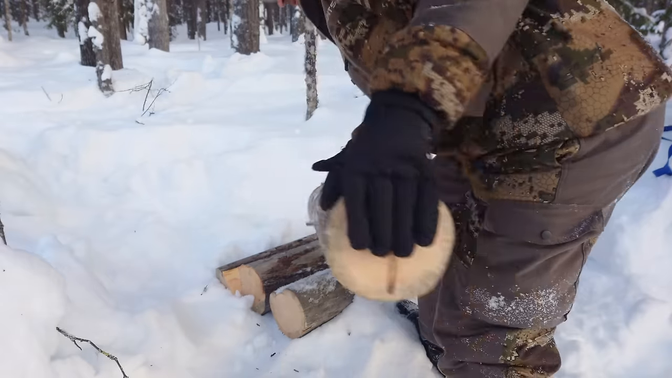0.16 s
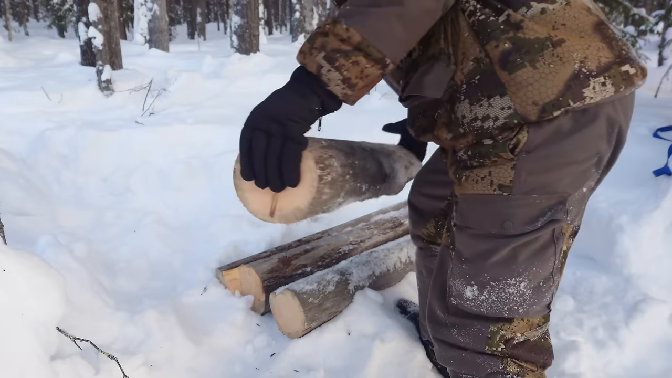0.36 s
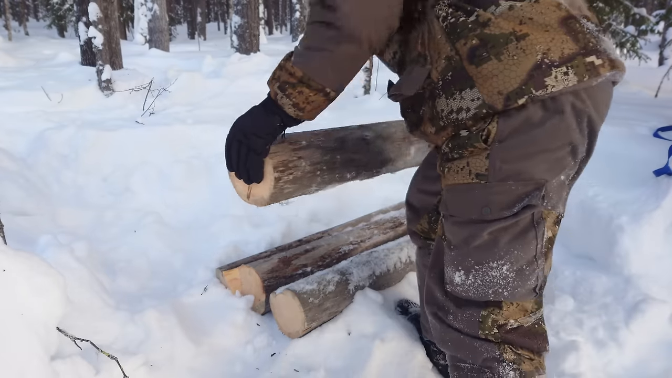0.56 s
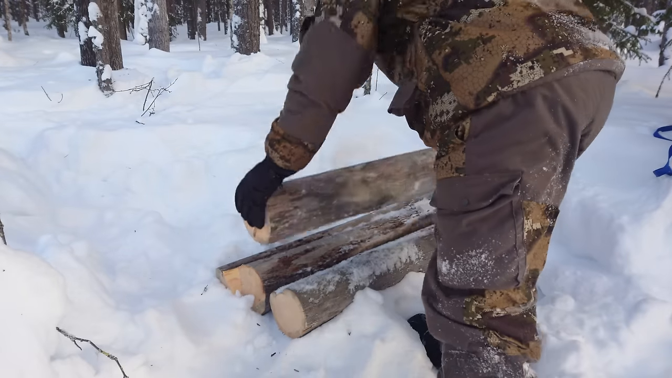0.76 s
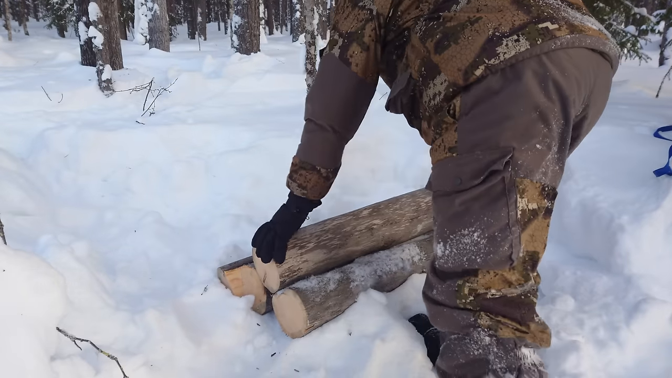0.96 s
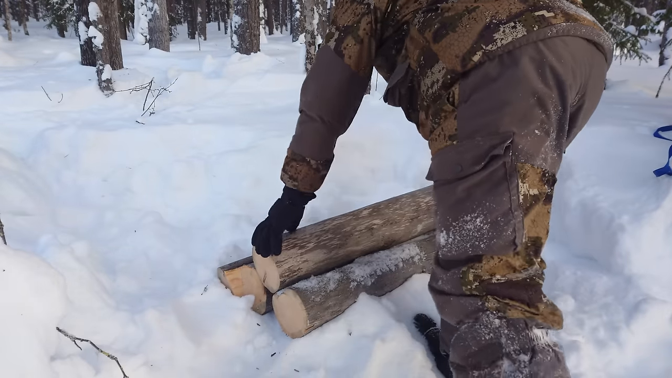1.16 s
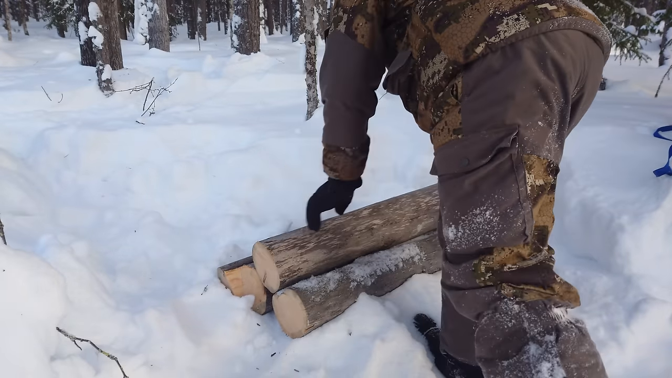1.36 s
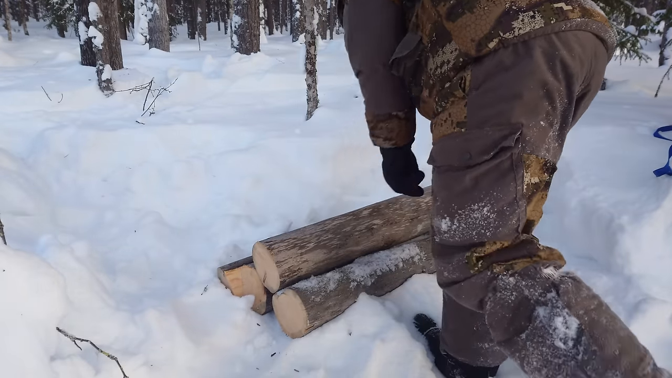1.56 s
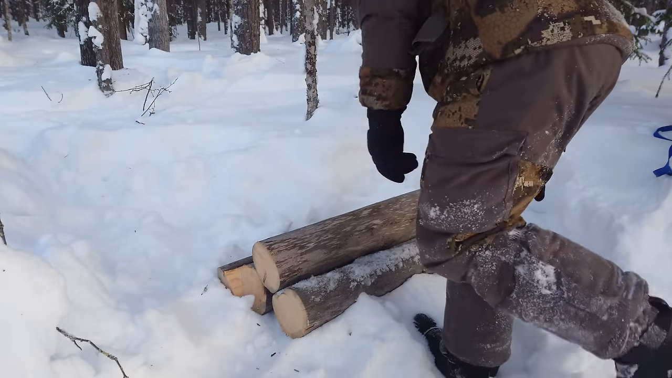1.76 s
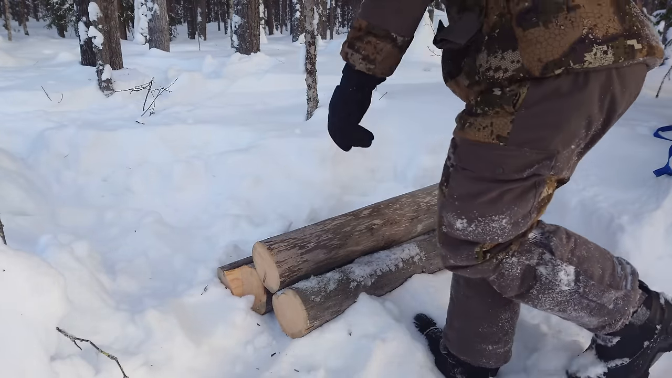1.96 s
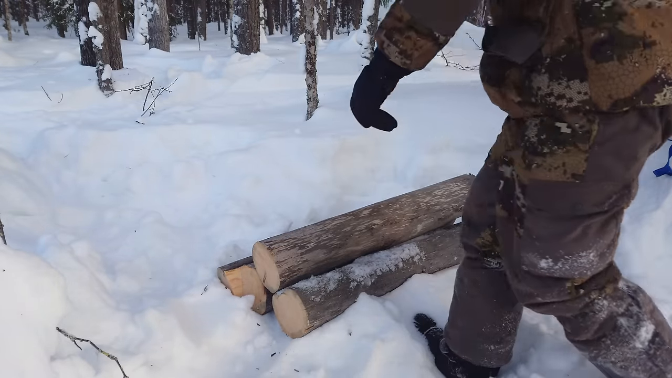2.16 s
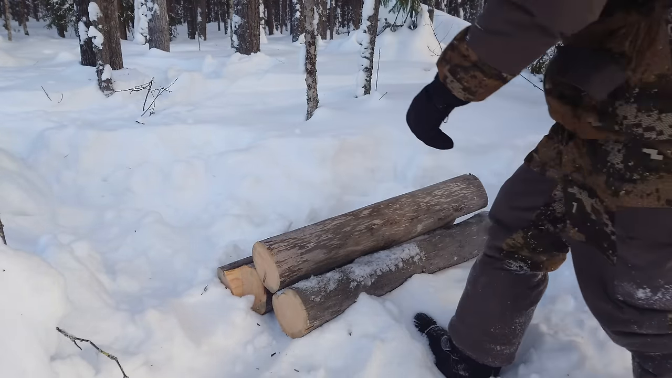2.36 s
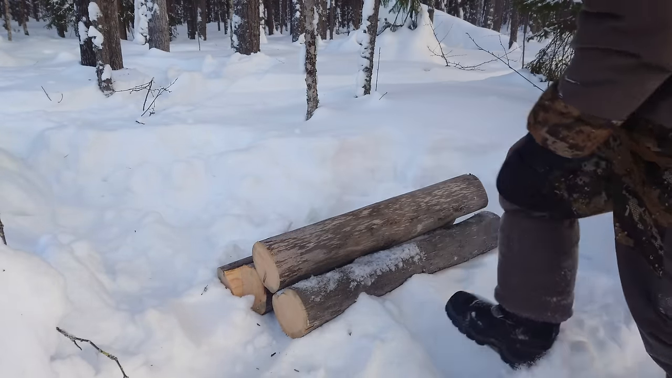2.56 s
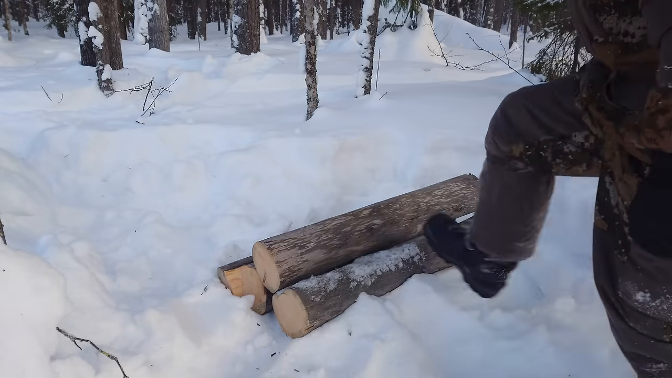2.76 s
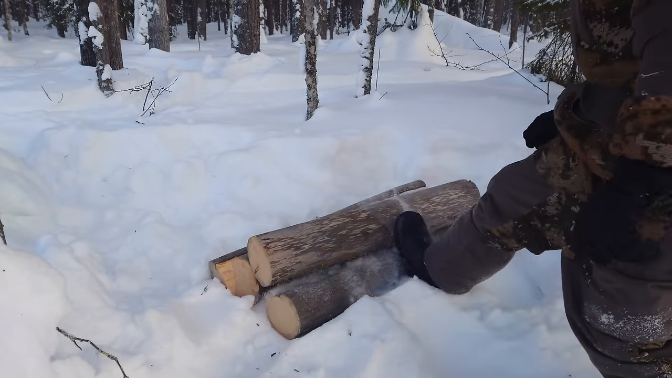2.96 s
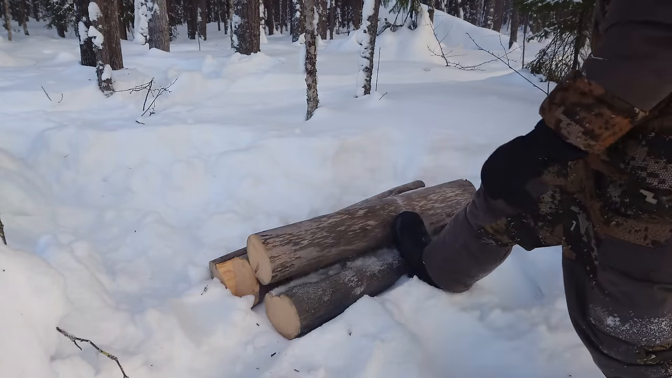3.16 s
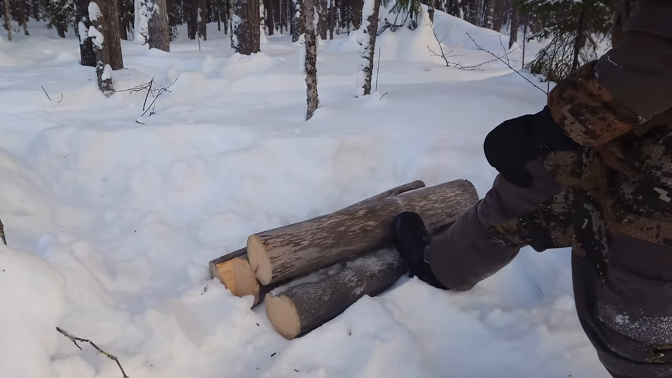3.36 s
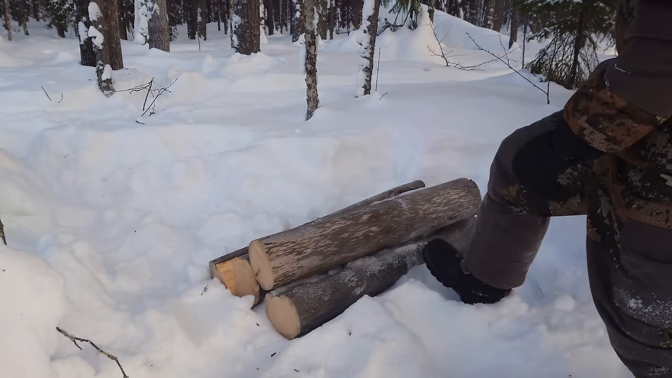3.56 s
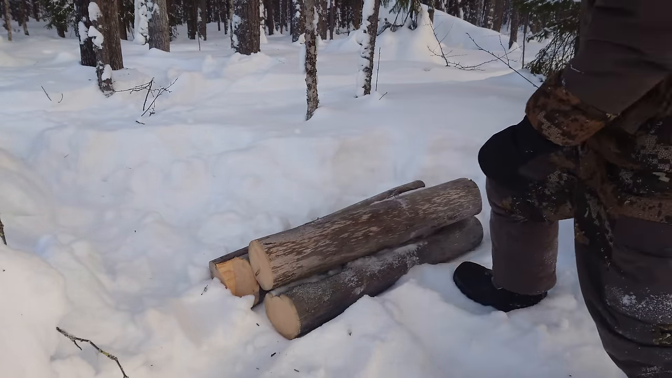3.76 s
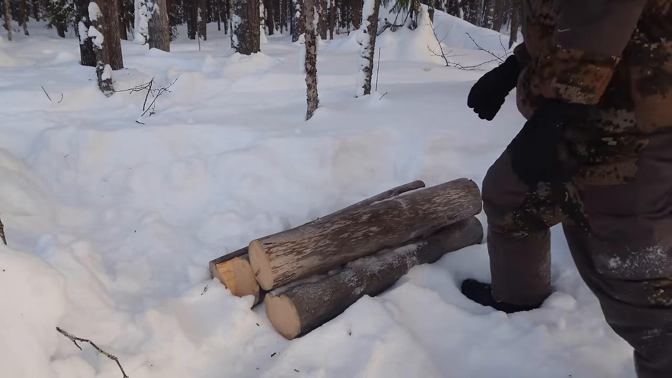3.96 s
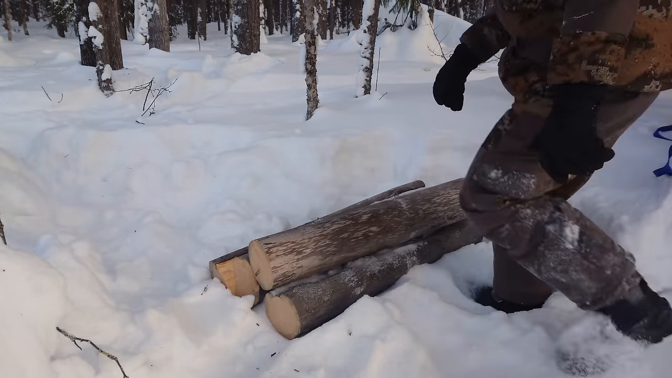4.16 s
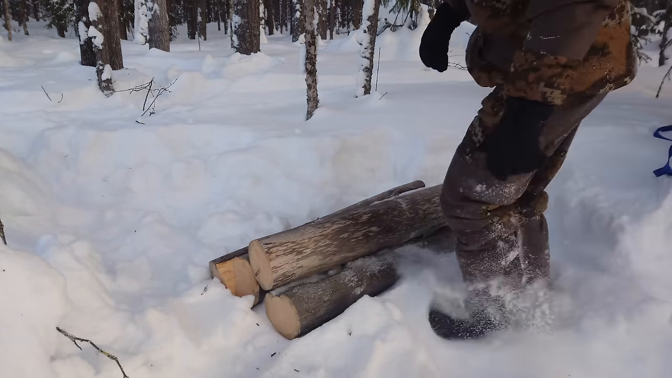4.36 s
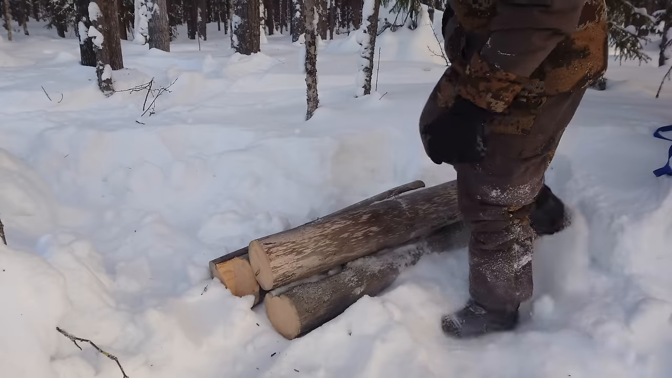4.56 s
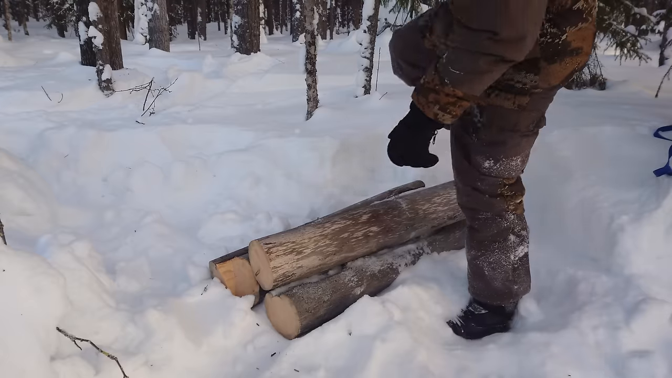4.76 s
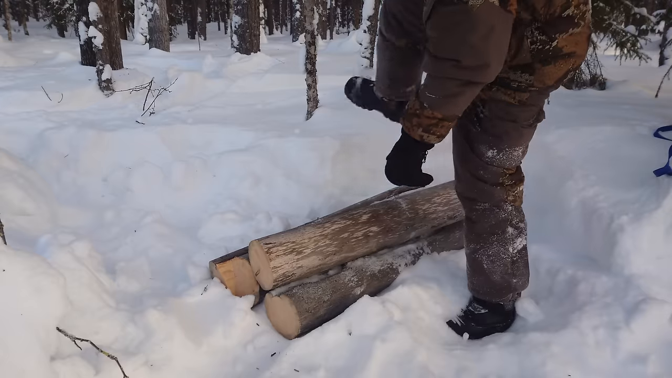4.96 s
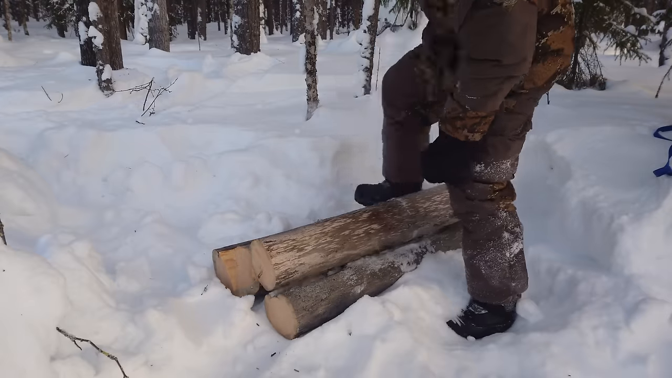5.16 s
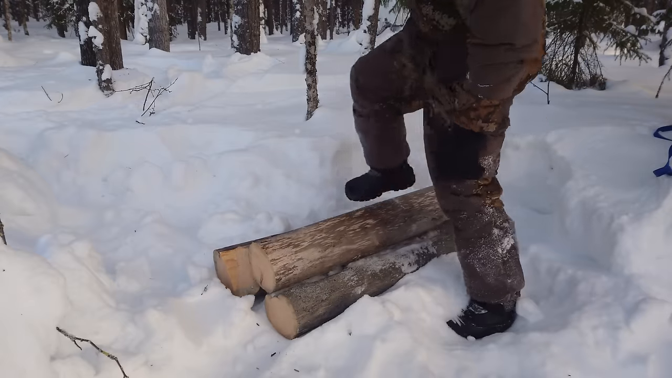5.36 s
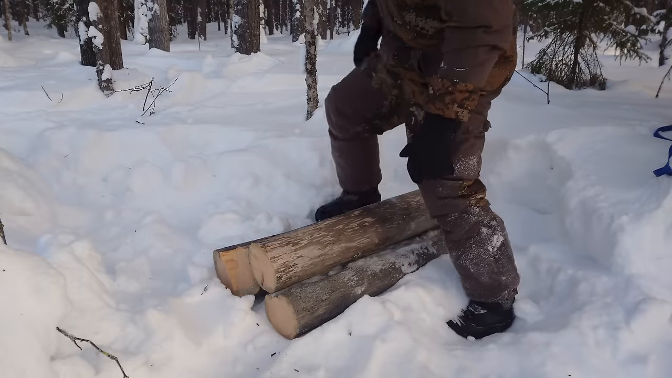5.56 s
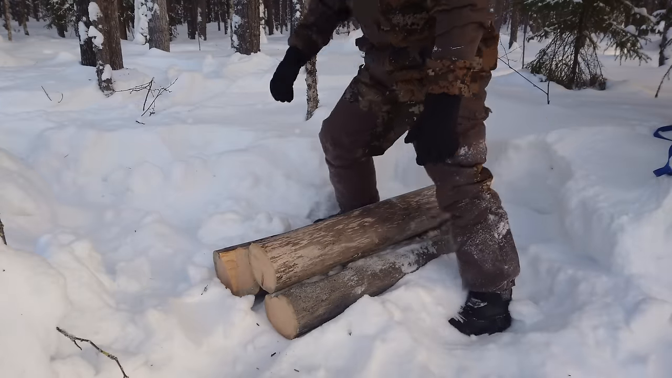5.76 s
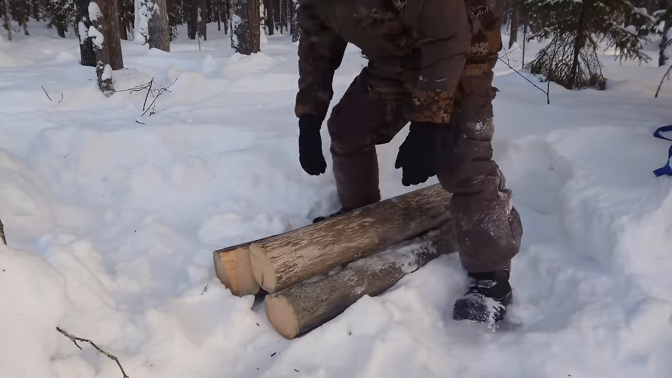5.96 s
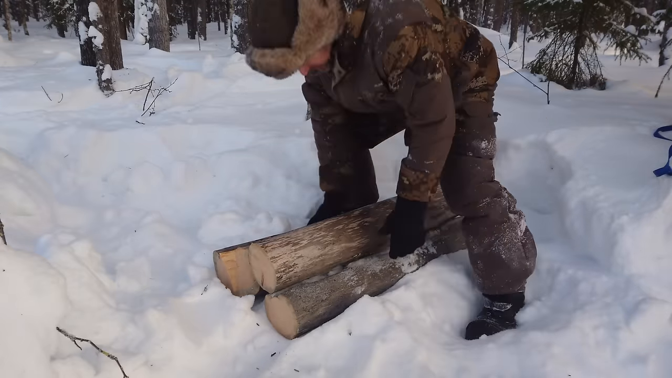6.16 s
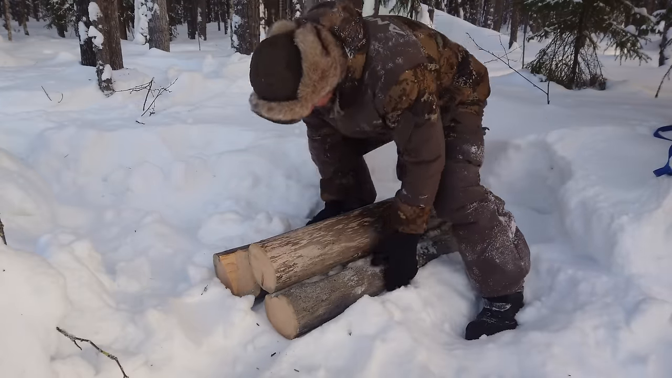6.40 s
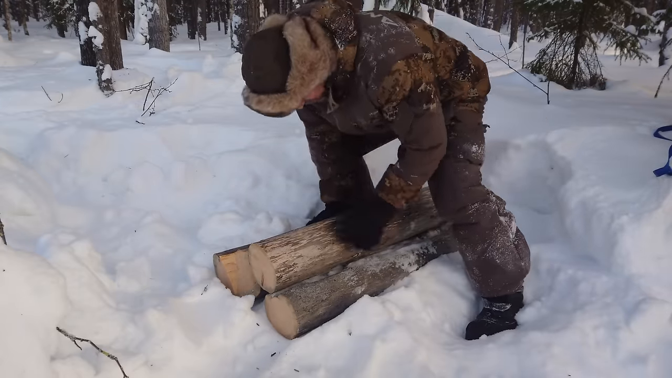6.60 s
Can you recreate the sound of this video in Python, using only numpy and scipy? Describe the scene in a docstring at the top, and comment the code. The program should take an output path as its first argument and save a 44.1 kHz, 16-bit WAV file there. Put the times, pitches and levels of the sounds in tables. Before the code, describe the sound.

Hollow knocks of a log being stacked and the pile kicked, with crunching steps in deep snow and rustling heavy clothes.

```python
"""Stacking a frozen log in deep snow

A man in winter clothes drops a short log on a small stack, then kicks the stack into line. The logs
ring hollow and thump the ground. His boots plough and pack the snow, and scrape and squeak on the bark;
trousers and sleeves swish. The snowy forest barely echoes. The loudest knock overloads the microphone."""
import sys
import numpy as np
from scipy import signal
from scipy.fft import rfft, irfft
from scipy.io import wavfile

SR = 44100
rng = np.random.default_rng(int(sys.argv[2]) if len(sys.argv) > 2 else 0)


def file_out(sig):
    """Save sig as 16-bit WAV at sys.argv[1]."""
    # one column per channel
    cols = np.atleast_2d(sig).T
    # limit, then scale
    lim = np.clip(cols, -1, 1)
    pcm = np.round(lim * 32767).astype(np.int16)
    wavfile.write(sys.argv[1], SR, pcm)


N = 292383
TIME = np.arange(N) / SR

# logs bouncing on each other (below 250 Hz) and bending: freq_hz, base_db, base_t60_s
LOG_MODES = [(108.6, 3, 0.063), (162, 2, 0.027), (212, -6.5, 0.057), (479.6, 4, 0.048), (530, 1, 0.18),
             (554.8, -4, .15), (670, -6.5, 0.052), (745, -2.5, 0.035), (998, -5.5, 0.041),
             (1111, -7.5, 0.051), (1177, -14, 0.12), (1530, -19.5, .028), (1730, -30, 0.04),
             (1846, -21, 0.033), (2137, -22, 0.043), (2400, -26.5, 0.065), (2910, -27.5, 0.071),
             (2730, -18, .03), (3350, -22, .03), (3800, -14, .03)]
# bark crunch spectrum: freq_hz, density_db
BARK_SPECTRUM = [(200, -10.5), (700, -10.5), (1400, 3), (2000, -7), (3000, 1), (4500, 3), (7000, -2.5),
                 (10000, -10.5), (15800, -16)]
# boot dragged over bark: start_s, length_s, ring_db, grit_db
SCRAPES = [(2.913, 0.17, -53.5, -48), (3.369, .11, -47, -47), (5.116, 0.064, -43.5, -39.5),
           (5.167, 0.16, -50, -62), (5.315, 0.16, -52.5, -46.5), (5.438, 0.09, -56, -52.5),
           (5.619, 0.11, -45.5, -44), (6.19, 0.23, -68, -52)]
# boot sinking into snow: start_s, length_s, pressure_db, loose_snow_db
STEPS = [(0.258, 0.052, -45.5, -57), (0.567, 0.28, -42, -41), (2.106, .24, -46, -43.5),
         (2.361, .2, -39, -46), (2.915, 0.12, -55.5, -56), (3.8, 0.23, -44, -48),
         (4.307, 0.23, -38.5, -41.5), (5.596, .16, -44.5, -55), (5.954, .36, -39.5, -48.5)]


def undb(db):
    """Decibels to gain."""
    return 10 ** (np.asarray(db) / 20)


def unit(x):
    """Scale to rms 1."""
    return x / np.sqrt(np.mean(x ** 2))


def add(out, start_s, x):
    """Mix x into out from start_s."""
    i = max(int(start_s * SR), 0)
    out[i:i + len(x)] += x[:max(N - i, 0)]


def fade(t60_s, size=26000):
    """Decay of 60 dB in t60_s."""
    return np.exp(-np.log(1000) * TIME[:size] / t60_s)


def colour(x, spectrum, size=8192):
    """Minimum-phase filter of unit power through (freq_hz, density_db) points."""
    hz, db = np.transpose(spectrum)
    bins_hz = np.maximum(np.arange(size // 2 + 1) * SR / size, 1)
    gain = undb(np.interp(np.log(bins_hz), np.log(hz), db))
    cepstrum = irfft(np.log(gain))
    cepstrum[1:size // 2] *= 2
    cepstrum[size // 2 + 1:] = 0
    response = irfft(np.exp(rfft(cepstrum)))
    return signal.fftconvolve(x, response / np.linalg.norm(response))[:len(x)]


def wander(rate_hz):
    """Smooth random drift, spread near 1."""
    knots = rng.standard_normal(int(N / SR * rate_hz) + 2)
    return np.interp(TIME * rate_hz, np.arange(len(knots)), knots)


def grains(per_s, spread_db):
    """Random tiny fractures, mostly weak; rms 1."""
    sizes = undb(spread_db * np.minimum(rng.exponential(size=N), 4))
    return unit((rng.random(N) < per_s / SR) * rng.choice([-1, 1], N) * sizes)


def ring(modes, t60_scale=1, mode_ratio=1, size=26000):
    """Free ring; mode k is weighted by mode_ratio ** k, so a negative ratio alternates polarity."""
    return sum(mode_ratio ** k * undb(db) * np.sin(2 * np.pi * hz * TIME[:size])
               * fade(t60_s * t60_scale, size) for k, (hz, db, t60_s) in enumerate(modes))


def push(x, contact_ms, size=2000):
    """Soften a ring by a force pulse lasting about contact_ms."""
    u = TIME[:size] * 4000 / contact_ms
    force = u * np.exp(-u)
    return signal.fftconvolve(x, force / force.sum())[:len(x)]


def swell(start_s, length_s, attack_s=0.019, release_s=0.04):
    """Attack, hold and release of a boot's weight, 0-1."""
    held_s = max(length_s, attack_s)
    return np.interp(TIME - start_s, [0, attack_s, held_s, held_s + release_s], [0, 1, 1, 0])


def forest(x, echo_db=-43, t60_s=0.63, delay_s=0.054, hiss_db=-63):
    """Distant trunks scatter a very faint echo over a steady, soft hiss."""
    # freq_hz, density_db
    echo_spectrum = [(100, -14.5), (300, -12), (550, -7), (2000, -2), (8000, -6)]
    hiss_spectrum = [(200, -1), (2500, -15), (5000, -7.5), (10000, -12), (15800, -16)]
    response, tail = np.zeros(N), fade(t60_s)
    add(response, delay_s, tail * colour(rng.standard_normal(len(tail)), echo_spectrum))
    echo = signal.fftconvolve(x, response / np.linalg.norm(response))[:N]
    hiss = colour(rng.standard_normal(N), hiss_spectrum)
    return undb(echo_db) * echo + undb(hiss_db) * hiss


def rumble(step_db=-32, scrape_db=-36, rest_db=-44, shake_s=0.15):
    """Low rumble that swells when a boot loads the snow or the stack."""
    # ground rumble: freq_hz, density_db
    spectrum = [(5, -3), (15, 9.5), (30, -1), (60, -4.5), (90, -16), (150, -26.5), (400, -63.5)]
    load = np.zeros(N)
    for rows, db in ((STEPS, step_db), (SCRAPES, scrape_db)):
        for start_s, length_s, *_ in rows:
            load = np.maximum(load, undb(db) * swell(start_s, length_s, release_s=shake_s))
    return colour(rng.standard_normal(N), spectrum) * np.hypot(load, undb(rest_db))


def clothes(crisp_hz=8000, flutter_db=1.3, peak_at=0.27):
    """Fibres rub and heavy fabric crumples dully as the man moves; quick swishes are crisper."""
    # briskness of movement: time_s, relative_db
    movement = [(0.0, -47.5), (0.5, -48.5), (0.76, -45), (0.94, -57), (1.2, -59), (1.62, -50.5),
                (2.03, -54), (2.16, -49), (2.69, -43.5), (2.86, -45), (3.05, -58), (3.32, -58.5),
                (3.51, -53), (3.84, -50.5), (4.06, -44), (4.38, -44), (4.54, -48), (5.15, -51.5),
                (5.28, -52), (5.63, -56), (5.96, -50), (6.26, -43), (6.5, -53), (6.63, -51)]
    # sleeve or trouser strokes: start_s, length_s, relative_db
    swishes = [(.81, 0.15, -41.5), (1.198, 0.13, -50.5), (1.662, .16, -49.5), (1.981, 0.069, -43),
               (2.022, 0.32, -43.5), (2.676, 0.071, -47), (3.37, .09, -49.5), (4.11, 0.19, -45.5),
               (4.262, 0.23, -37.5), (4.453, 0.12, -40.5), (4.81, 0.085, -44), (5.792, .05, -48.5),
               (5.885, .045, -45), (6.048, 0.2, -42.5), (6.315, .027, -33), (6.395, 0.13, -45.5),
               (6.528, 0.031, -45)]
    # rubbing fibres, crumpling fabric: freq_hz, density_db
    rub_spectrum = [(400, -26), (1000, -5.5), (2000, -8.5), (2800, -10.5), (3800, -3.5), (4800, -1.5),
                    (6000, -3.5), (7500, -7), (9500, -11.5), (12500, -15.5), (15800, -22)]
    crumple_spectrum = [(100, -1.5), (250, 2.5), (450, 3), (800, 1), (1400, -4.5), (2200, -9.5),
                        (3200, -13.5), (8000, -38)]
    rustle = undb(np.interp(TIME, *np.transpose(movement)) + 2)
    swish = sum(undb(db) * np.sqrt(np.interp((TIME - start_s) / length_s, [0, peak_at, 1], [0, 1, 0]))
                for start_s, length_s, db in swishes)
    fibres = colour(unit(rng.standard_normal(N) + 0.8 * grains(3000, 2.2)), rub_spectrum)
    treble = signal.sosfiltfilt(signal.butter(2, crisp_hz, "high", fs=SR, output="sos"), fibres)
    rub = (fibres - treble) * np.hypot(rustle, swish)
    rub += treble * np.hypot(undb(-2) * rustle, undb(3) * swish)
    crumple = colour(grains(3500, 2.2), crumple_spectrum) * np.hypot(undb(-9) * rustle, undb(-11) * swish)
    return rub * undb(flutter_db * wander(70)) + crumple


def sleeve_zip(start_s=0.815, end_s=0.868, from_hz=1050, to_hz=2250, level_db=-36, jitter=0.11):
    """Ribbed cloth rubs ever faster as the log swings down: a short rising zip."""
    progress = np.clip((TIME - start_s) / (end_s - start_s), 0, 1)
    rib_hz = (from_hz + (to_hz - from_hz) * progress) * (1 + jitter * wander(1100))
    envelope = np.sqrt(np.abs(np.sin(np.pi * progress)))
    return undb(level_db) * envelope * np.sin(2 * np.pi * np.cumsum(rib_hz) / SR)


def steps(lead_s=0.03, plough_s=0.07, flutter_db=1.6):
    """Each boot ploughs loose snow aside, then deeper snow packs in small collapses."""
    # loose and packing snow: freq_hz, density_db
    powder_spectrum = [(100, -9), (250, -2.5), (450, 4), (800, 1), (1400, 0), (2200, -7.5), (3200, -8),
                       (8000, -23), (15000, -44)]
    packing_spectrum = [(40, -15.5), (90, 3), (170, 0), (260, -3.5), (450, -11), (800, -20.5),
                        (2000, -44.5)]
    pressure, loose = np.zeros(N), np.zeros(N)
    for start_s, length_s, pressure_db, loose_db in STEPS:
        pressure = np.maximum(pressure, undb(pressure_db) * swell(start_s, length_s))
        plough = swell(start_s - lead_s, length_s + lead_s, attack_s=plough_s)
        loose = np.maximum(loose, undb(loose_db) * plough)
    powder = colour(grains(3500, 2.6), powder_spectrum) * loose * undb(flutter_db * wander(60))
    packing = colour(grains(300, 4.5), packing_spectrum) * pressure * undb(-0.5)
    return powder + packing


def small_pops(per_step=3, above_db=4, scatter_db=3.5, pitch_hz=450, spread_octaves=0.5):
    """Random lesser pops, louder under more pressure: start_s, level_db, pitch_hz."""
    draws = rng.uniform(-0.91, 1, (len(STEPS), per_step, 3))
    return [(start_s + length_s * (when + 1) / 2,
             pressure_db + above_db + scatter_db * size,
             pitch_hz * 2 ** (spread_octaves * pitch))
            for (start_s, length_s, pressure_db, _), pops in zip(STEPS, draws)
            for when, size, pitch in pops]


def crumps(rise_cycles=0.35, settle_db=-10, settle_t60_s=0.06, size=3000):
    """A snow layer collapses with one dull pop, then crackles as it settles."""
    # packed snow giving way: start_s, level_db, pitch_hz
    loud_pops = [(.032, -33, 660), (.103, -31.5, 400), (0.163, -32, 330), (0.26, -34, 248),
                 (.276, -38, 396), (.286, -26, 410), (0.544, -29, 450), (.577, -22, 318),
                 (.626, -31.5, 800), (.692, -32.5, 510), (.740, -26, 302), (.752, -24, 200),
                 (0.967, -30, 159), (0.995, -38, 140), (2.403, -25, 304), (2.418, -29, 400),
                 (2.545, -28.5, 180), (2.695, -25.5, 367), (3.041, -40, 198), (3.197, -36, 297),
                 (3.761, -28, 423), (3.826, -38, 300), (4.026, -27.5, 255), (4.567, -25.5, 174),
                 (4.983, -29, 326), (5.007, -33, 283), (5.288, -36, 450), (5.584, -34, 905),
                 (5.609, -34.5, 710), (5.741, -30.5, 282), (5.991, -26.5, 169), (6.097, -28.5, 330),
                 (6.615, -30.5, 318)]
    # freq_hz, density_db
    settle_spectrum = [(60, -14), (200, -2), (500, 0.5), (900, -7.5), (1600, -20), (4000, -42.5)]
    pops, settling = np.zeros(N), np.zeros(N)
    for start_s, db, pitch_hz in loud_pops + small_pops():
        cycles = pitch_hz * TIME[:size]
        rise = cycles / rise_cycles
        add(pops, start_s, undb(db) * np.sin(2 * np.pi * cycles) * rise * np.exp(1 - rise))
        add(settling, start_s, undb(db + settle_db) * fade(settle_t60_s))
    return pops + colour(settling * grains(1500, 1.4), settle_spectrum)


def footfalls():
    """The snow pack thuds softly as each boot takes the weight."""
    # weight landing: start_s, gain_db
    landings = [(0.294, -28), (2.619, -17), (3.462, -26.5), (3.586, -17), (3.836, -25), (3.885, -22),
                (4.02, -22), (4.325, -26), (4.572, -26), (5.984, -22.5), (6.244, -15.5)]
    # snow pack: freq_hz, level_db, base_t60_s
    snow_modes = [(56.4, -1.5, 0.29), (79, -6, 0.17)]
    out = np.zeros(N)
    thud = push(ring(snow_modes, t60_scale=0.99), contact_ms=10)
    for start_s, db in landings:
        add(out, start_s, undb(db) * thud)
    return out


def snaps(splinter_db=-9):
    """Frozen bark and ice crust crack: one sharp release, then brief splintering."""
    # brittle cracks: start_s, impulse_db, splinter_t60_s
    fractures = [(.769, -21, 0.04), (0.854, -11.5, .003), (2.983, -23.5, 0.008), (3.281, -31.5, .013),
                 (3.341, -34.5, .017), (3.5932, -21.5, 0.0029), (5.133, -7, .003), (5.1521, -8.5, .0025),
                 (5.36, -29, .035), (5.648, -20, 0.014), (6.206, -19.5, 0.034), (6.228, -23.5, .037),
                 (6.309, -16, .022), (6.316, -16.5, 0.02)]
    # cracking ice: freq_hz, density_db
    ice_spectrum = [(500, -18), (1800, -8), (3000, -1.5), (4500, 4.5), (7000, -0.5), (10000, -17.5),
                    (15800, -24.5)]
    cracks, splinters = np.zeros(N), np.zeros(N)
    for start_s, db, t60_s in fractures:
        add(cracks, start_s, undb([db]))
        add(splinters, start_s, undb(db + splinter_db) * fade(t60_s))
    return colour(cracks + splinters * rng.standard_normal(N), ice_spectrum)


def squeaks(fall=0.16, jitter=0.085, rasp=0.47):
    """The sole sticks and slips at an uneven, falling rate, with a rasp of ice crystals."""
    # rubber on bark: start_s, length_s, pitch_hz, level_db
    slips = [(3.572, 0.013, 2524, -34), (5.466, 0.013, 2500, -30), (5.502, 0.013, 2470, -35.5),
             (5.517, 0.018, 2380, -40), (5.657, 0.017, 2400, -33.5)]
    out, wobble = np.zeros(N), wander(1500)
    grit = colour(grains(6800, 2.5), BARK_SPECTRUM)
    for start_s, length_s, pitch_hz, db in slips:
        progress = np.linspace(0, 1, int(length_s * SR))
        span = int(start_s * SR) + np.arange(len(progress))
        slip_hz = pitch_hz * (1 + fall * (0.5 - progress) + jitter * wobble[span])
        phase = 2 * np.pi * np.cumsum(slip_hz) / SR
        tone = np.sin(phase) + 0.93 * np.sin(2 * phase) + 0.53 * np.sin(3 * phase)
        add(out, start_s, undb(db) * np.sin(np.pi * progress) * (tone + rasp * grit[span]))
    return out


def scrapes():
    """The tread catches on bark ridges: tiny blows that crackle and keep the log humming."""
    drive, grit = np.zeros(N), np.zeros(N)
    catches = grains(1500, 2.7)
    for start_s, length_s, ring_db, grit_db in SCRAPES:
        stroke = np.sin(np.linspace(0, np.pi, int(length_s * SR)))
        add(drive, start_s, undb(ring_db) * stroke)
        add(grit, start_s, undb(grit_db) * stroke)
    # each catch pulls and lets go, favouring the upper modes
    body = np.diff(push(ring(LOG_MODES, t60_scale=0.68, mode_ratio=-1.05), contact_ms=0.42))
    hum = signal.fftconvolve(drive * catches, body / np.linalg.norm(body))[:N]
    return hum + colour(grit * catches, BARK_SPECTRUM)


def log_knocks(bark_t60_s=0.047, settle_s=0.125):
    """Each blow rings the wood, rocks the stack and crushes bark; a kick adds the boot's thud."""
    # blows: start_s, ring_db, contact_ms, t60_scale, thump_db, bark_db, boot_db
    knocks = [(.8770, -1.5, 0.43, 1.18, -14.5, -39, -57), (0.8814, -8, 0.18, 0.98, -41, -31, -62),
              (2.8331, -10.5, 0.39, 0.61, -11, -22, -20), (2.8400, -26, 0.22, 1.37, -24, -34, -40),
              (2.898, -35, 1, 2, -50, -60, -38), (3.464, -53.5, 0.92, 0.75, -34.5, -62, -48),
              (3.578, -48, .13, 1.5, -38, -28.5, -50), (5.1236, -26.5, 0.2, 0.55, -13.5, -27, -6.5),
              (5.243, -46.5, 0.4, 1.4, -29.5, -36.5, -44), (5.649, -52, 0.31, 1.3, -27, -34, -47),
              (6.250, -44, 1, 1., -22.5, -57, -44), (6.317, -43.5, 0.34, 0.6, -41, -28, -27)]
    # stack rocking on its snow bed: freq_hz, level_db, t60_s
    bed_modes = [(32.23, 2.5, 0.35), (65.8, -4, 0.17), (141, -18, 0.12)]
    # stiff rubber boot, heel thud to sole slap: freq_hz, level_db, base_t60_s
    boot_modes = [(79.7, -1, 0.08), (178, -10.5, 0.046), (255, -13.5, 0.029), (618, -16, 0.063),
                  (870, -24, 0.058), (1122, -11, 0.036), (1331, -12.5, 0.052), (1450, -14.5, 0.04)]
    impacts, bark = np.zeros(N), np.zeros(N)
    thump = push(ring(bed_modes), contact_ms=0.88)
    boot = push(ring(boot_modes, t60_scale=0.91), contact_ms=0.48)
    for start_s, ring_db, contact_ms, t60_scale, thump_db, bark_db, boot_db in knocks:
        wood = push(ring(LOG_MODES, t60_scale, mode_ratio=-1.03), contact_ms)
        wood *= np.exp(-(TIME[:len(wood)] / settle_s) ** 2)  # bedding down chokes the ring
        add(impacts, start_s, -undb(ring_db) * wood - undb(thump_db) * thump - undb(boot_db) * boot)
        add(bark, start_s, undb(bark_db) * fade(bark_t60_s))
    return impacts + colour(bark * grains(9000, 1.17), BARK_SPECTRUM)


def scene():
    """Close sources in still, open air; mono."""
    near = (log_knocks() + scrapes() + footfalls() + steps() + crumps() + snaps() + squeaks()
            + sleeve_zip() + clothes() + rumble())
    return (near + forest(near))[None]


def record(dry):
    """The microphone clips at full scale; a steep low-pass cuts the top."""
    top_hz = 15800
    lowpass = signal.ellip(10, 0.1, 80, top_hz, fs=SR, output="sos")
    return signal.sosfilt(lowpass, np.clip(dry, -1, 1))


dry = scene()
out = record(dry)
file_out(out)
```